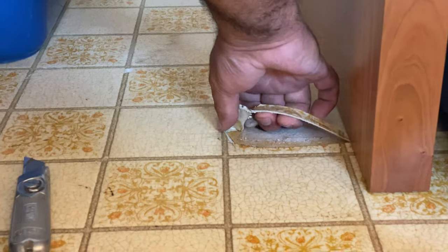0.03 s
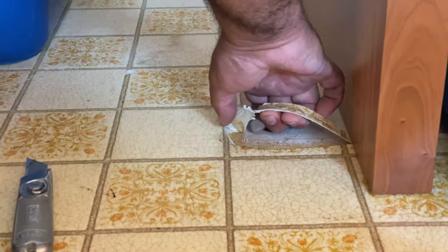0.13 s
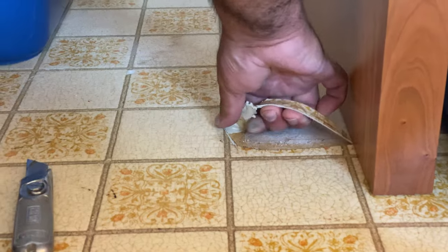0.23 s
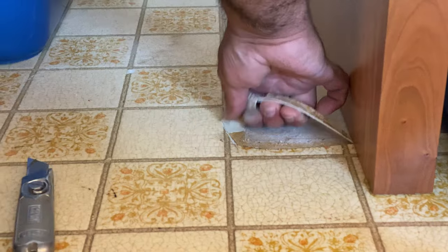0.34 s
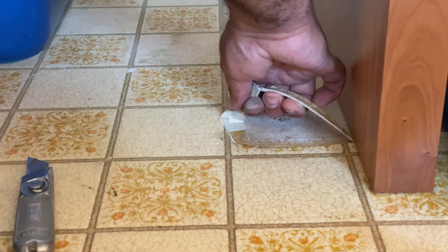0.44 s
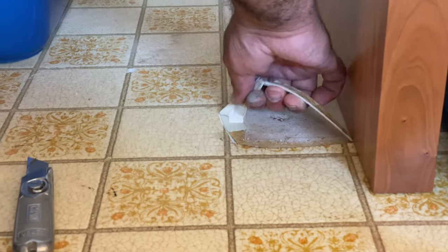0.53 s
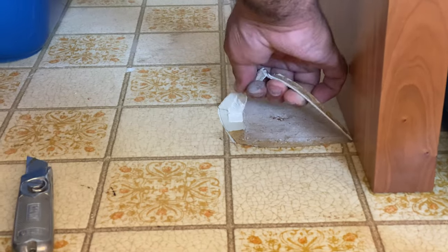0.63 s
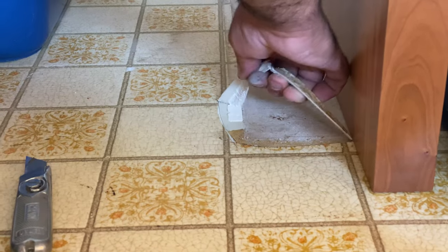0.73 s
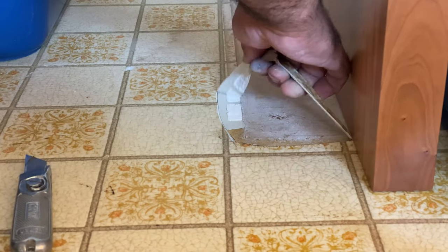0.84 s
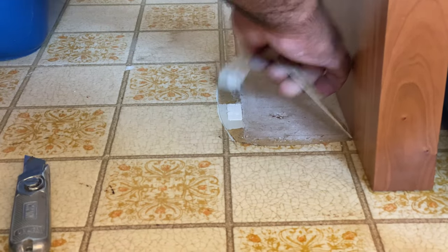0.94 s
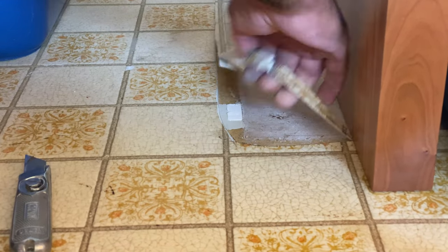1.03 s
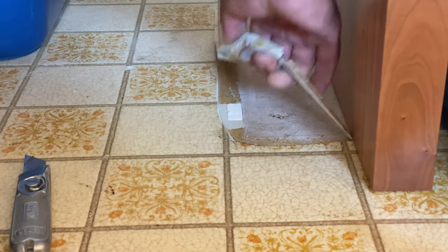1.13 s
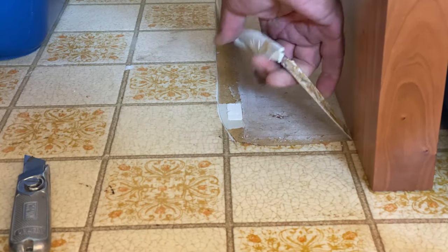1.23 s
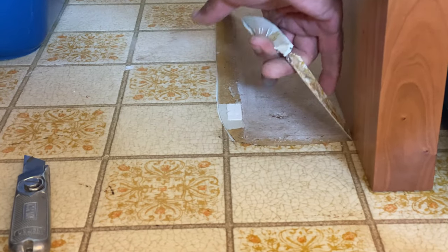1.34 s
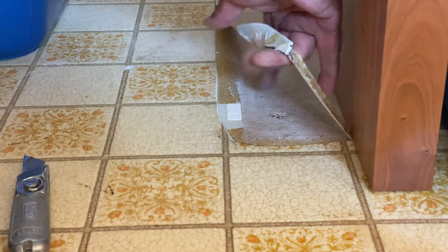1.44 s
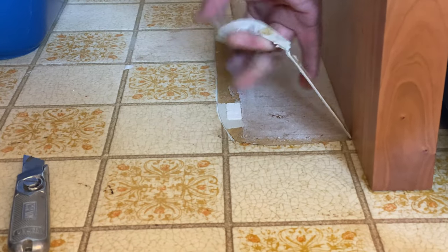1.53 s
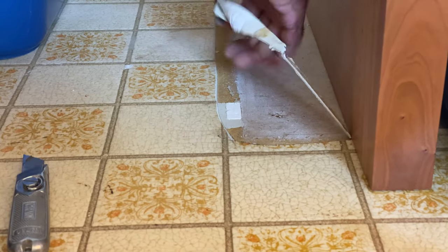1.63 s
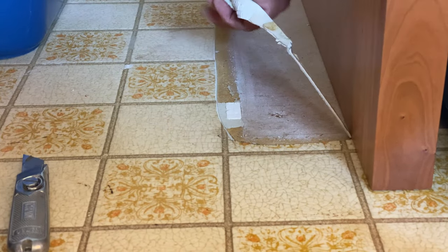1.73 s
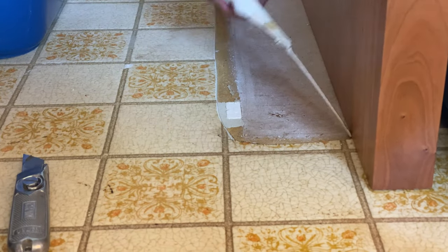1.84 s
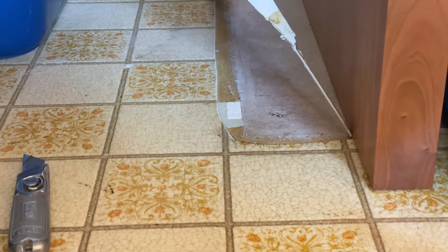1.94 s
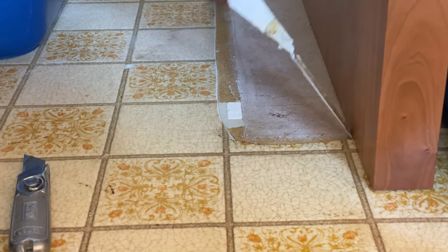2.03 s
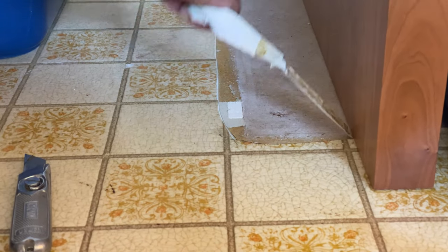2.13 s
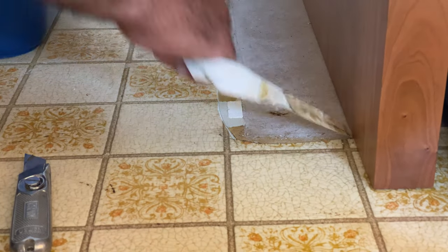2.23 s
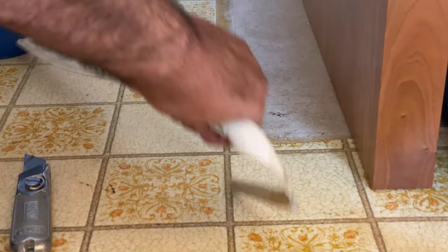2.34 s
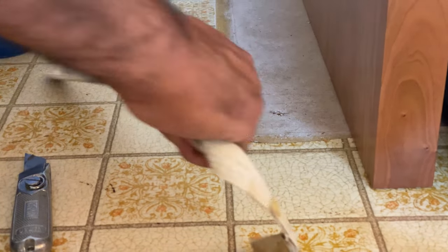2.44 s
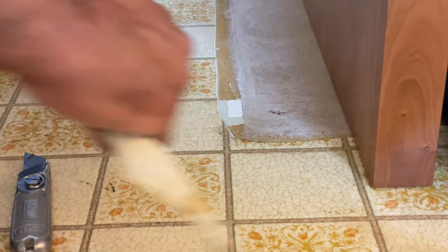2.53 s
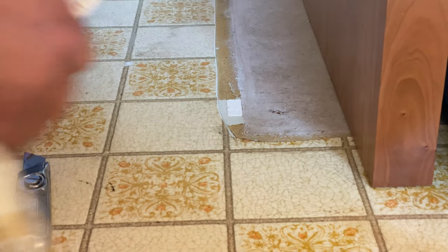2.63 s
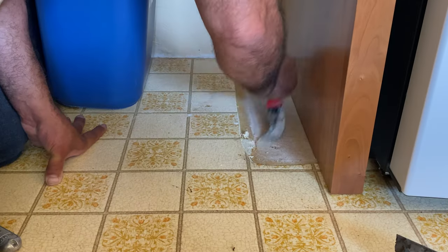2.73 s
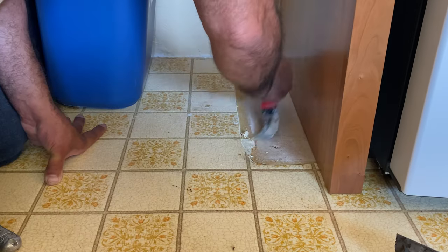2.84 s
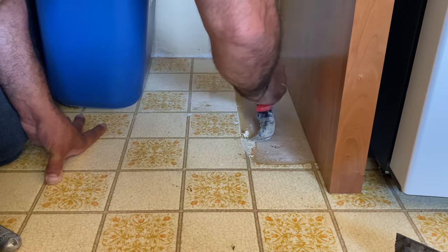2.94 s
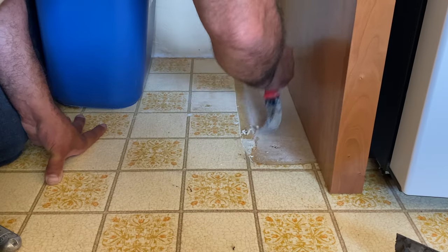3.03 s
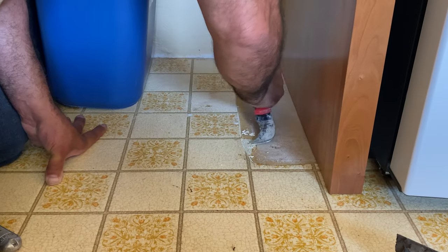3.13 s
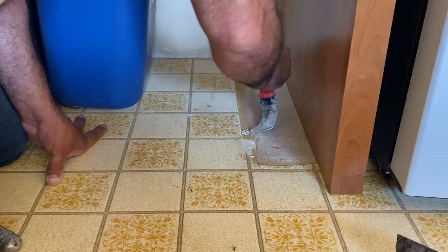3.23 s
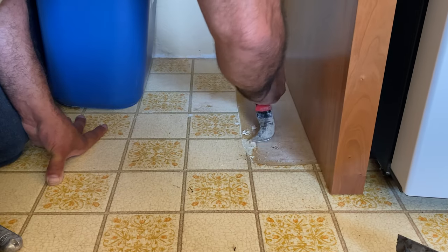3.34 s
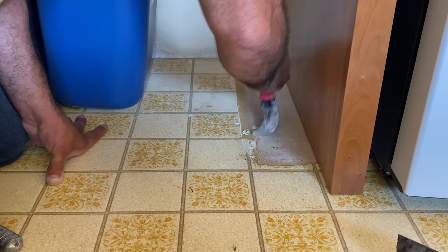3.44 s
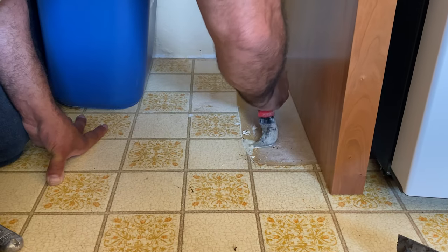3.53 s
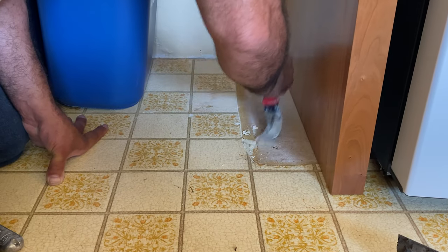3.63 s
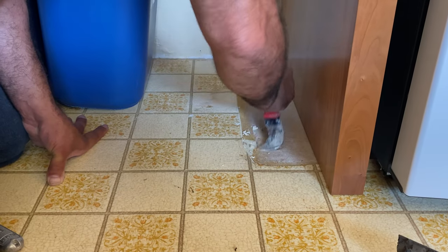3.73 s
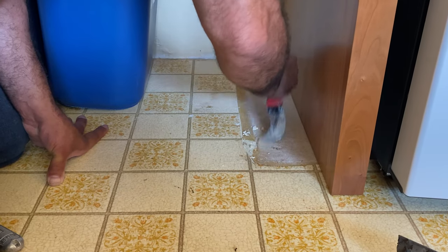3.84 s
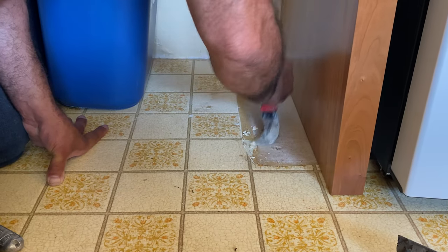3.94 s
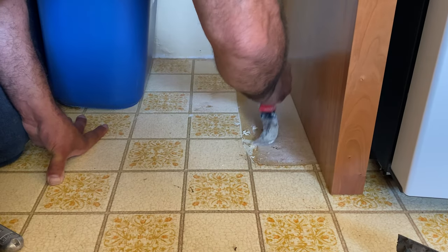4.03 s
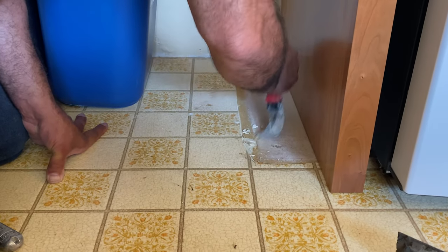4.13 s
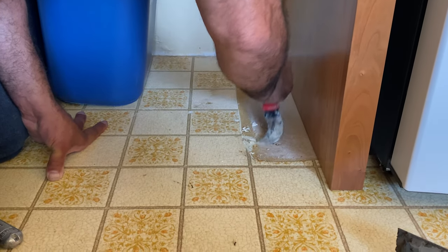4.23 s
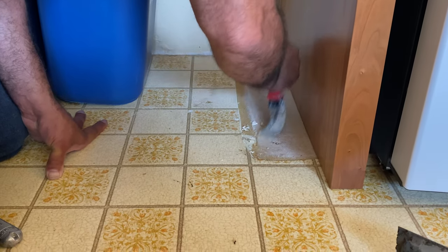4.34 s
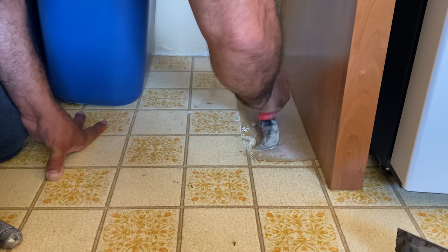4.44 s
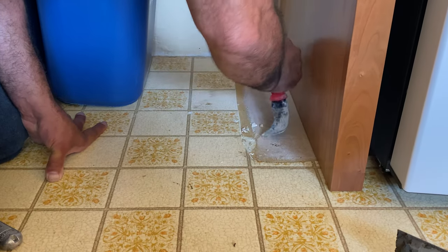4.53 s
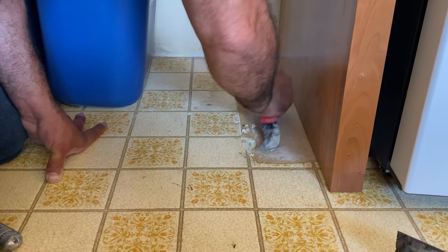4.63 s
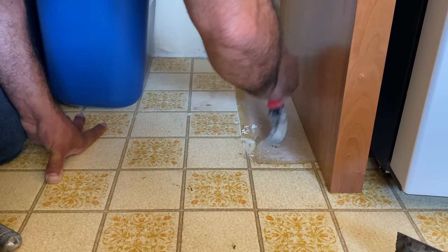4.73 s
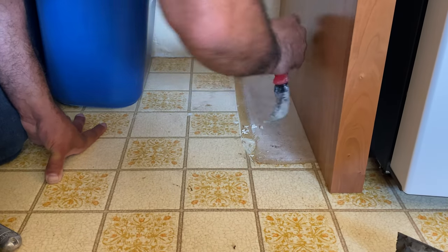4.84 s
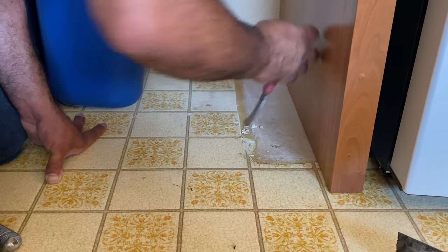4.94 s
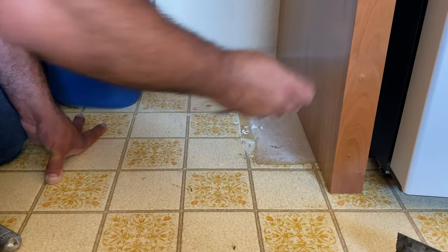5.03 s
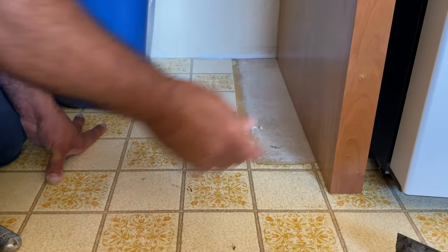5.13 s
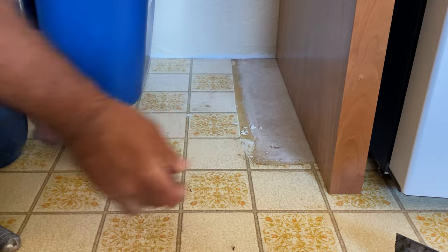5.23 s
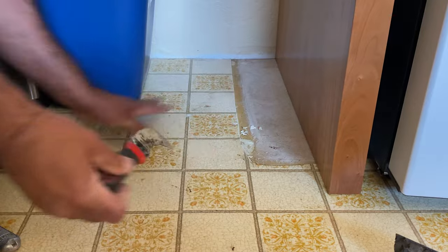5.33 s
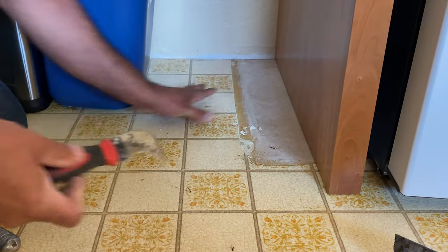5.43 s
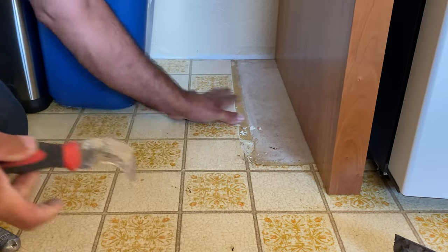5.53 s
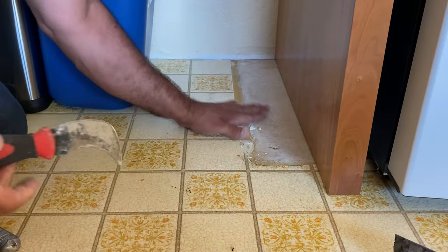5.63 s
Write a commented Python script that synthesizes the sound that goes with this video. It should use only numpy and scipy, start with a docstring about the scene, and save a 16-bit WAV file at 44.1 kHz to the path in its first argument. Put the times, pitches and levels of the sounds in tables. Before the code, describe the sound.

Indoors, close to the floor, with short room reflections and a faint low room tone. From 0 to 0.5 s a few dry ticks and one sharp snap sound as glued vinyl starts lifting. Cracks thicken from 0.55 s into a loud, brittle, tearing crackle, strongest at about 0.92-0.98 s, with soft board thumps beneath. From 1.05 to 2.1 s there is only airy rustling, small creaks and sparse ticks. At 2.18 s the strip slaps down with a dull thud and brief rustle, then a short lull. From 2.74 s a steel scraper jabs: two strokes close together, then one roughly every 0.2 s until about 4.7 s, ten in all. Each has a clattery mid-pitched blade contact, a quickly fading gritty scrape and a low wooden thump; softer drag-back ticks fall between. After 4.8 s it is quiet, with faint handling clicks near 5.2 s and soft bumps and a breathy skin rub from 5.5 s.

```python
"""Glue cracks as a hand peels a strip of old vinyl off a wooden floor; the strip rustles and slaps down.
Then a steel putty knife jabs quickly under the next tile, and pushes thump the boards in a small room.
Cracks are shaped noise bursts; the rustle and sliding blade are coloured noise with chance catches.
Jabs drive ringing blade and tile modes with random slips; thumps are decaying sines of the boards.
Room tone lies underneath, and sparse random reflections make the reverberation."""
import sys
import numpy as np
from scipy import signal
from scipy.fft import rfft, irfft, next_fast_len
from scipy.io import wavfile
from scipy.ndimage import uniform_filter1d

SR = 44100
rng = np.random.default_rng(int(sys.argv[2]) if len(sys.argv) > 2 else 0)


def unload_audio(sound):
    """Save the sound as a 16-bit wav file, at the path given as the first command line argument."""
    columns = np.transpose(np.atleast_2d(sound))
    # keep every value between -1 and 1, then stretch to whole-number steps
    steps = np.round(np.clip(columns, -1, 1) * 32767)
    wavfile.write(sys.argv[1], SR, steps.astype(np.int16))


N = 250355

# Glue and vinyl cracking, the strip slapping. Each row: start in seconds, level of the bright part in dB,
# centre in Hz, length in ms, low body relative to the bright part in dB.
CRACK_EVENTS = [(.0813, -47, 4640, 3.5, -26), (0.1519, -23.5, 3640, 2.4, -11.5),
                (.2343, -39, 2530, 6.7, -22), (.2765, -33.5, 5440, 4.2, -37), (0.3047, -43, 5520, 2.8, -22),
                (0.3368, -12.5, 5400, 1.9, -15.5), (0.3506, -21, 4860, 5.6, -27),
                (0.5653, -14.5, 4630, 4.4, -11.5), (.658, -20.5, 7150, 4.2, -33),
                (0.671, -25, 2760, 3.6, -27), (0.6981, -11.5, 7140, 0.28, -23), (.716, -29, 5240, 2.5, -34),
                (.789, -16.5, 5160, 7.4, -16), (.8182, -11, 5100, 2.8, -14), (.839, -8.5, 5830, 3.2, -21.5),
                (0.9172, -12.5, 6800, 10, -9.5), (0.9268, -1.5, 3880, 2.8, -15),
                (.9324, -21, 3760, 3.5, -27), (0.9402, -7.5, 6270, 2.8, -39),
                (0.947, -7.5, 7310, 2.7, -36.5), (.9701, -4, 6600, 2.3, -30), (.9725, -7, 6900, 1.1, -16.5),
                (0.9807, -8.5, 7190, 2.4, -33), (0.9839, -18, 2420, 1.4, -20),
                (1.2066, -40.5, 3330, 4.4, -3), (1.267, -42.5, 4300, 2.6, -9), (1.313, -40, 2810, 3.8, -12),
                (1.552, -28.5, 3240, 8.8, -32), (1.5606, -34.5, 2850, 8, -10), (1.676, -34, 2680, 3.6, -21),
                (1.722, -36.5, 2900, 6.4, -12), (1.8396, -26, 4900, 1.6, -8.5),
                (1.8904, -28, 2070, 3.5, -14), (1.9164, -32.5, 3960, 2.1, -14),
                (2.07, -37, 5400, 3.2, -28.5), (2.093, -30, 2740, 5.1, -26), (2.1784, -29, 2080, 5.7, 16.5),
                (2.222, -27.5, 2470, 8.2, 3), (2.2408, -25.5, 2080, 3.5, -13),
                (2.2557, -16.5, 3260, 5, -14), (2.2955, -28.5, 2040, 2.9, -0.5),
                (2.3812, -39.5, 2050, 5.2, 3), (2.7073, -44, 4650, 5.5, -3), (4.6189, -26.5, 3900, 6, -3),
                (4.7381, -39.5, 2440, 5.5, 3), (4.8358, -44.5, 2340, 1.2, 0),
                (5.2006, -31.5, 4500, 3.7, -10), (5.231, -48, 2830, 2.8, 7),
                (5.3075, -39.5, 2850, 2.7, -2.5)]
# Colour shared by the cracks. Each row: frequency in Hz, gain in dB.
CRACK_COLOUR = [(300, 7.5), (1000, -3.5), (2500, -4), (6000, 0), (9000, -1), (13000, -4.5), (15500, 7.5),
                (16500, 5)]
CRACK_FIZZ_DB = -2.2  # trim of every crack over 11 kHz
STRIP_HZ, STRIP_DB = 440, 6  # the bent strip's hollow under each crack's body


def cracks():
    """Each crack is a sharp front and a few milliseconds of splintering; its low body dies more slowly."""
    out, t = np.zeros(N), np.arange(2500) / SR
    noises = rng.standard_normal((len(CRACK_EVENTS), 2500))

    def body_gain_db(f):
        broad = -6.0 * np.log2((f + 1) / 900) ** 2
        hollow = STRIP_DB - 60 * np.log2((f + 1) / STRIP_HZ) ** 2
        return np.maximum(broad, hollow)

    for (s, db, centre_hz, ms, body_db), noise in zip(CRACK_EVENTS, noises):
        ms = max(ms, .3)

        def bright_gain_db(f):
            off_centre = np.minimum(np.log2((f + 1) / centre_hz) ** 2, 2.5)
            return read(CRACK_COLOUR, f) - 4.35 * off_centre + CRACK_FIZZ_DB * shelf(f, 11000, order=8)

        splintering = (1 - np.exp(-4000 * t / ms)) * np.exp(-(1000 * t / ms) ** 2)
        front = .5 * np.exp(-t / 0.000068)
        bright = colour(noise, bright_gain_db) * (splintering + front)
        body = colour(noise, body_gain_db) * np.minimum(t / 0.0008, 1) * np.exp(-400 * t / ms)
        add(out, s - .0004, amp(db) * (peaked(bright) + amp(body_db) * peaked(body)))
    return out


# Skin and vinyl rubbing, gliding from row to row. Each row: time in seconds, level in dB,
# lift of the low body in dB, lift of the fizz in dB.
RUSTLE_COURSE = [(0.0, -100, -21, -16), (.1, -59, 3.5, 8), (.45, -73.5, 14.5, 8), (.55, -56, 8.5, 15),
                 (.9, -75, -3, 2.5), (1.05, -48, 3, 11), (1.3, -67.5, 12, 4), (1.5, -60, 6.5, 9),
                 (1.8, -66.5, -1.5, 8), (1.9, -60.5, 14.5, 13.5), (2.02, -56, -0.5, 7),
                 (2.16, -61, 1.5, -18.5), (2.2, -41, 7, -13.5), (2.4, -56.5, 9, -12),
                 (2.52, -71.5, 9.5, -13), (2.66, -72.5, 1.5, -6.5), (2.71, -53, 9, -10),
                 (4.8, -68.5, 4.5, 8), (5.06, -73, 13, 5.5), (5.19, -60, 7.5, 11), (5.31, -64.5, 3.5, 9),
                 (5.37, -68.5, 5, 7), (5.49, -70.5, 7, 8), (5.58, -51, -4, 17), (5.67, -46, 6, 8)]
# Colour of the rubbing. Each row: frequency in Hz, gain in dB.
RUB_COLOUR = [(40, -33.5), (110, -4), (250, -8.5), (700, -20.5), (1700, -13.5), (3000, -17), (6000, -20.5),
              (9000, -31.5), (14000, -38.5), (16500, -33.5)]
# Spells when the rubbing takes on one colour. Each row: middle in seconds, half length in seconds,
# centre in Hz, width in octaves, boost in dB.
CREAK_SPELLS = [(1.435, 0.068, 1620, 0.26, 11.5), (1.48, 0.037, 626, 0.54, 14.5),
                (1.641, 0.046, 990, 0.12, 22), (1.67, .08, 2850, 0.1, 13), (5.23, 0.098, 5040, 0.41, 8.5),
                (5.63, 0.051, 1440, 0.25, 6)]
# The freed vinyl rustles on after each crack: level dB = TRAIL_DB + TRAIL_SHARE x crack dB, then it falls.
TRAIL_DB, TRAIL_SHARE, TRAIL_FALL_DB_PER_S = -35.5, 0.72, 218.5


def rustle():
    """Dense uneven ticks blur into a hiss; patches of colour drift by chance; listed spells add the creaks."""
    course_s, course_db, course_body_db, course_fizz_db = np.transpose(RUSTLE_COURSE)
    flutter = amp(0.92 * evened(uniform_filter1d(rng.standard_normal(N), 150)))
    ticks = evened(snags()) * rng.standard_normal(N) * flutter
    hz, t, spectrum = signal.stft(ticks, SR, nperseg=512)

    now = np.arange(N) / SR
    crack_s, crack_db = np.transpose(CRACK_EVENTS)[:2]
    trails = dying(now, crack_s, TRAIL_DB + TRAIL_SHARE * crack_db, TRAIL_FALL_DB_PER_S)
    level = np.sqrt(amp(np.interp(now, course_s, course_db)) ** 2 + trails)

    body_db, fizz_db = np.interp(t, course_s, course_body_db), np.interp(t, course_s, course_fizz_db)
    colour_db = read(RUB_COLOUR, hz)[:, None]
    colour_db = colour_db + np.outer(1 - shelf(hz, 1320, order=6), body_db)
    colour_db += np.outer(shelf(hz, 7400, order=6), fizz_db)
    for mid_s, half_s, centre_hz, octaves, db in CREAK_SPELLS:
        band = np.exp(-(np.log2((hz + 1) / centre_hz) / octaves) ** 2)
        colour_db += db * np.outer(band, np.exp(-((t - mid_s) / half_s) ** 4))
    patches = rng.standard_normal(spectrum.shape)
    patches = evened(uniform_filter1d(uniform_filter1d(patches, 5, 0), 12, 1))

    # the base colour's power from 2 to 9 kHz sets the reference level
    middle = amp(read(RUB_COLOUR, hz))[(hz > 2000) & (hz < 9000)]
    scale = np.sqrt(np.mean(middle ** 2) * 7000 / (SR / 2))
    return level * signal.istft(spectrum * amp(colour_db + 1.3 * patches) / scale, SR, nperseg=512)[1][:N]


# One push of the knife. Each row: start in seconds, slide level in dB, slide fall in dB per second,
# low ring left free in Hz, high ring left free in Hz, knock of the tile in Hz, ring of the sliding edge in Hz.
KNIFE_STROKES = [(2.738, -36.5, 90, 1410, 2870, 420, 2670), (2.842, -35.5, 103, 1290, 4140, 516, 2460),
                 (3.072, -32.5, 163, 1240, 1920, 374, 2000), (3.286, -30, 127, 1260, 3860, 446, 2520),
                 (3.516, -35.5, 120, 1400, 1934, 417, 2200), (3.716, -32, 111, 1225, 2130, 440, 2290),
                 (3.947, -34.5, 91, 1330, 2370, 410, 2380), (4.169, -33.5, 160, 1280, 3330, 467, 2420),
                 (4.37, -36, 113, 1165, 1930, 430, 2330), (4.583, -37, 122.5, 1120, 3380, 483, 2250)]


def grip(t):
    """Low ring, high ring, knock pitch and edge ring in Hz; the hand's grip holds until the next stroke."""
    strokes = np.array(KNIFE_STROKES)
    under_way = np.maximum(np.searchsorted(strokes[:, 0], t + .004) - 1, 0)
    return strokes[under_way, 3:].T


# The blade touches, stops against the glue or is dragged back. Each row: start in seconds,
# level of the low ring in dB, chatter decay in ms, then tile knock and hardness relative to that ring in dB.
JAB_EVENTS = [(2.7396, -15, 6.3, -4.5, -2.5), (2.8419, -17.5, 12, -1, -13), (2.859, -13, 5.7, -1, -1.2),
              (3.004, -28.5, 4.2, -1.5, -0.5), (3.0097, -29, 3.3, -27, -4), (3.073, -16.5, 15, 2.5, -5.5),
              (3.0892, -13, 3.4, -8.5, 2.4), (3.225, -26.5, 22, -7, -3.5), (3.2866, -17.5, 7.7, 2.5, -1.5),
              (3.3007, -18.5, 12, 2.5, 0), (3.3068, -15, 7, -24, 1), (3.4409, -32.5, 4.5, 2.5, -5.5),
              (3.521, -16, 4.8, 4, -6), (3.5253, -17, 4.3, 0.5, 7.5), (3.6583, -46, 3.6, 10, 4.5),
              (3.7199, -16, 5.6, 4.5, -0.2), (3.7277, -13.5, 9.8, -6, -2.5), (3.8595, -36, 5.2, 3.5, -22),
              (3.9507, -15, 6.3, -3, 2.5), (3.9545, -17, 3.1, -3, 1), (4.091, -49, 7.8, -11, -7),
              (4.1699, -13.5, 2.2, -7.5, -10), (4.1802, -16.5, 6, -5, -5.5), (4.1985, -25.5, 2.6, 6, -7),
              (4.284, -38.5, 9, 1, -3.5), (4.372, -22, 14, 9.5, -5), (4.3801, -12, 6.9, -8.5, -11),
              (4.4093, -26, 6.8, 0, -8.5), (4.4898, -48, 9.1, 14, 10), (4.5128, -38.5, 3.9, 2, 1.2),
              (4.5854, -22.5, 33, 0.5, -11), (4.5976, -21, 14, 4.5, -23), (4.6189, -29, 9.4, 8.5, 7),
              (4.6479, -23, 7.6, -6, -30), (4.6794, -44, 15, 8, -13)]
# Modes of blade and handle. Each row: frequency in Hz, width in Hz, level in dB.
BLADE_MODES = [(610, 42, 4), (759, 130, 5.5), (1030, 78, -2.5), (1130, 45, 3), (1292.4, 43, 4),
               (1496, 38.6, 4), (1936, 28, -7.5), (2096, 29, -12.5), (2610, 125, -13), (3050, 97, -8.5),
               (3252, 120, -8), (3470, 150, -12.5), (4003, 280, -8.5), (5150, 300, -18)]
# The stiff tile knocks. Each row: frequency in Hz, width in Hz, level in dB.
TILE_MODES = [(351, 85, -6), (382.6, 59, -3.5), (447, 61, -4.5), (526.4, 72, -1), (542, 73, -2)]
# Crushed glue under the blade. Each row: frequency in Hz, gain in dB.
GRIT_COLOUR = [(1500, -19), (3000, -4), (5500, 1), (8000, -2.5), (11000, -6.5), (14500, -4), (16500, -11)]


def jabs():
    """A firm first slip, then a dying chatter; slips ring the blade, knock the tile and crush grit."""
    out, t = np.zeros(N), np.arange(5000) / SR
    blade_hz, tile_hz = np.transpose(BLADE_MODES)[0], np.transpose(TILE_MODES)[0]
    blade = rings(BLADE_MODES, t)
    tile = rings(TILE_MODES, t) * (1 - np.exp(-t / 0.0017))
    smear = np.exp(-np.arange(60) / 27.0)  # grit lingers briefly after each slip
    chances = rng.random((len(JAB_EVENTS), 3, 5000))

    for (s, db, ms, knock_db, hard_db), (a, b, c) in zip(JAB_EVENTS, chances):
        low_hz, high_hz, knock_hz = grip(s)[:3]
        force = np.exp(-1000 * t / max(ms, .5))
        slips = force * (a < 1500 / SR) * (.5 + b) * np.sign(c - .35)  # about 1500 slips a second
        slips[0] = 1.46
        mode_chance = amp(3.0 * (c[:len(BLADE_MODES)] - .5))  # each mode's strength varies from jab to jab
        low_ring = mode_chance * freed(blade_hz, low_hz, 31.0, -63.0) @ blade
        high_ring = mode_chance * freed(blade_hz, high_hz, 38.0, -5.5) * (blade_hz > 1700) @ blade
        knock_ring = freed(tile_hz, knock_hz, 36.0, -10.0) @ tile
        low, high, knock = (peaked(signal.fftconvolve(slips, ring)[:len(t)])
                            for ring in (low_ring, high_ring, knock_ring))
        crushing = 1.6 * force + np.convolve(abs(slips), smear)[:len(t)]
        grit = colour((a - .5) * crushing, lambda f: read(GRIT_COLOUR, f))
        hard = amp(hard_db) * (high + 0.49 * peaked(grit))  # hard contact wakes high modes and grit together
        add(out, s - .0005, amp(db) * (low + amp(knock_db) * knock + hard))
    return out


# Every touch is followed by a short scuff: level dB = SCUFF_DB + SCUFF_SHARE x jab dB, then it falls.
SCUFF_DB, SCUFF_SHARE, SCUFF_FALL_DB_PER_S = -36.5, 0.36, 400
SLIDE_RING_WIDTH_HZ, SLIDE_RING_DB, SLIDE_GRIT_DB = 340, -5, -16


def drag():
    """Fine slips of the sliding edge keep the blade ringing and grind grit."""
    flutter = amp(1.1 * evened(uniform_filter1d(rng.standard_normal(N), 60)))
    slips = snags() * rng.standard_normal(N) * flutter
    hz, t, spectrum = signal.stft(evened(slips), SR, nperseg=512)

    now = np.arange(N) / SR
    push_s, slide_db, fall = np.transpose(KNIFE_STROKES)[:3]
    jab_s, jab_db = np.transpose(JAB_EVENTS)[:2]
    power = dying(now, push_s, slide_db, fall)
    power += dying(now, jab_s, SCUFF_DB + SCUFF_SHARE * jab_db, SCUFF_FALL_DB_PER_S)

    low_hz, _, _, edge_hz = grip(t)
    column_hz = hz[:, None]
    modes = np.sqrt(sum(amp(db) ** 2 / (1 + ((column_hz - f) / w) ** 2)
                        for f, w, db in TILE_MODES + BLADE_MODES))
    low = modes * freed(column_hz, low_hz, 23.0, -12.0)
    high = modes / (1 + ((column_hz - edge_hz) / SLIDE_RING_WIDTH_HZ) ** 2)
    low_part = low / np.sqrt(np.mean(low ** 2, 0))
    high_part = amp(SLIDE_RING_DB) * high / np.sqrt(np.mean(high ** 2, 0))
    grit = amp(SLIDE_GRIT_DB) * evened(amp(read(GRIT_COLOUR, hz)))[:, None]
    return np.sqrt(power) * signal.istft(spectrum * (low_part + high_part + grit), SR, nperseg=512)[1][:N]


# Pushes on the boards. Each row: start in seconds, peak in dB, pitch that this spot favours in Hz,
# ring time as a factor.
THUMP_EVENTS = [(0.046, -41, 124, 1), (0.091, -40, 128, 0.95), (0.159, -29, 137, 1), (0.338, -35, 142, 1),
                (0.354, -20, 138, 0.27), (0.524, -32, 130, 0.59), (0.543, -26, 160, 0.55),
                (0.569, -23, 153, 0.63), (0.675, -16, 125, 1), (0.701, -22, 132, 0.3),
                (0.724, -27.5, 77, 0.46), (0.793, -24.5, 87, 1), (0.82, -17, 134, 1),
                (0.842, -31, 100, 0.45), (0.92, -24, 230, 0.43), (0.933, -8, 127, 0.55),
                (0.974, -24, 169.3, 0.64), (1.116, -33.5, 93, 1), (1.552, -39, 91.5, 1),
                (1.695, -31.5, 111, 1), (1.844, -28.5, 175, 0.47), (1.888, -33, 156, 1),
                (1.912, -36, 152, 0.83), (2.184, -10.5, 229, 0.37), (2.226, -19.5, 100, 0.73),
                (2.26, -35, 83.4, 1), (2.74, -21.5, 146, 1), (2.854, -10, 129, 0.94),
                (2.869, -21.5, 113, 0.52), (3.009, -30, 111, 0.75), (3.085, -16.5, 150, 0.38),
                (3.098, -8, 114, 0.74), (3.239, -23, 149, 0.53), (3.296, -11.5, 151, 0.39),
                (3.316, -6, 138, 0.43), (3.45, -31, 125, 0.78), (3.526, -11, 146, 0.85),
                (3.728, -10, 125, 1), (3.748, -15, 254, 0.47), (3.954, -10, 140, 0.96),
                (4.091, -32, 118, 0.38), (4.177, -15.5, 111, 0.74), (4.196, -16.5, 167, 0.5),
                (4.226, -25.5, 76.6, 0.46), (4.382, -10.5, 126, 0.86), (4.519, -24.5, 133.7, 0.9),
                (4.595, -17.5, 159, 1), (4.625, -22.5, 153, 0.64), (4.659, -19.5, 147, 1),
                (5.196, -44, 148, 0.67), (5.524, -34, 119, 1), (5.549, -32.5, 102, 0.97),
                (5.6, -42, 162, 0.87)]
# Modes of the floor boards. Each row: frequency in Hz, level in dB, time to fall 60 dB in seconds.
BOARD_MODES = [(71.7, -2, 0.43), (111.3, -1.5, 0.12), (128, 5.5, 0.095), (155.4, 1.5, 0.14),
               (208.2, 3.5, 0.14), (260.8, 7.5, 0.17), (312, -9.5, 0.14), (422, -5, 0.058),
               (422, -18.5, 0.056)]


def thumps():
    """A soft push rings the floor boards, most the modes near the pitch of the spot."""
    out, t = np.zeros(N), np.arange(12000) / SR
    soft_onset = (1 - np.exp(-t / 0.0031)) ** 2
    for s, db, spot_hz, lasting in THUMP_EVENTS:
        ring = np.zeros(len(t))
        for hz, mode_db, t60 in BOARD_MODES:
            off_spot_db = 29.5 * min(np.log2(hz / spot_hz) ** 2, .75)
            fall_db = 60 * t / (t60 * max(lasting, .15))
            ring += amp(mode_db - off_spot_db - fall_db) * np.sin(2 * np.pi * hz * t)
        add(out, s - .002, amp(db) * peaked(ring * soft_onset))
    return out


SNAGS_PER_S, SNAG_S, SNAG_DB = 60, .003, -1  # chance catches in any rubbing: rate, decay, mean added gain


def snags():
    """Gain of a rubbing contact that now and then catches and lets go."""
    catches = rng.exponential(1, N) * (rng.random(N) < SNAGS_PER_S / SR)
    return 1 + amp(SNAG_DB) * signal.lfilter([1], [1, -np.exp(-1 / (SNAG_S * SR))], catches)


# Decay of the room. Each row: frequency in Hz, time to fall 60 dB in seconds.
ROOM_DECAY = [(80, 0.46), (250, 0.26), (700, 0.36), (1500, 0.41), (4000, 0.25), (10000, 0.23)]


def room(x):
    """Sparse reflections of random sign swell in within milliseconds, each band dying at its own speed."""
    taps = np.zeros((2, 30000))
    at = np.arange(120, 29980, 20) + rng.integers(0, 20, (2, 1493))  # one in every 20 samples
    np.put_along_axis(taps, at, rng.choice([-1., 1.], at.shape), 1)
    hz, t, spectrum = signal.stft(pair(*taps), SR, nperseg=512)
    swell = 1.1 - np.exp(-t / 0.0017)
    decay = amp(-60 * t / read(ROOM_DECAY, hz)[:, None])
    tail = signal.istft(spectrum * swell * decay, SR, nperseg=512)[1]
    tail[:, :120] = 0  # nothing returns before the first reflection
    return signal.fftconvolve(x[None], tail / np.linalg.norm(tail[0]), axes=1)[:, :N]


# Colour of the room tone. Each row: frequency in Hz, gain in dB.
HUSH_COLOUR = [(15, -24.5), (25, -1.5), (101, -3), (237, -7.5), (665, -16.5), (817, -12), (1870, -20),
               (2300, -42), (4990, -44.5), (10500, -64), (12000, -61.5), (15600, -101), (22000, -120)]
HUSH_DB = -53.5


def hush():
    """Steady room tone, slightly swelling."""
    left, other, drift = rng.standard_normal((3, N))
    swell = amp(1.0 * evened(uniform_filter1d(uniform_filter1d(drift, 5000), 5000)))
    tone = evened(colour(pair(left, other), lambda f: read(HUSH_COLOUR, f)))
    return amp(HUSH_DB) * swell * tone


# Left-right likeness of reverberation and room tone. Each row: frequency in Hz, likeness from -1 to 1.
LIKENESS = [(60, 1), (250, 0.78), (600, 0.22), (1600, -0.4), (3000, -0.19), (7000, 0.33), (10000, .8),
            (16000, .85)]


def pair(left, other):
    """A second channel that shares the bass and follows the likeness curve above it."""
    size = next_fast_len(len(left))
    same = np.clip(read(LIKENESS, np.fft.rfftfreq(size, 1 / SR)), -.99, .99)
    right = same * rfft(left, size) + np.sqrt(1 - same ** 2) * rfft(other, size)
    return np.array([left, irfft(right, size)[:len(left)]])


def rings(modes, t):
    """One decaying sine a mode; a wider mode dies faster."""
    return np.array([(-1) ** k * amp(db) * w * np.exp(-np.pi * w * t) * np.sin(2 * np.pi * hz * t)
                     for k, (hz, w, db) in enumerate(modes)])


def freed(hz, free_hz, db_per_octave2, floor_db):
    """Gain of modes that fall away on both sides of a favoured pitch."""
    return amp(np.maximum(-db_per_octave2 * np.log2((hz + 1) / free_hz) ** 2, floor_db))


def dying(t, starts, levels_db, falls_db_per_s):
    """Summed power of sounds that start at once and then fall steadily in dB."""
    levels_db, falls = np.reshape(levels_db, (-1, 1)), np.reshape(np.abs(falls_db_per_s), (-1, 1))
    since = t - np.reshape(starts, (-1, 1))
    level_db = levels_db - falls * np.maximum(since, 0)
    return (amp(level_db) ** 2 * (since >= 0)).sum(0)


def amp(db):
    """Decibels to amplitude."""
    return 10 ** (np.asarray(db) / 20)


def evened(x):
    """Scales to an RMS of 1."""
    return x / np.sqrt(np.mean(x ** 2) + 1e-20)


def peaked(x):
    """Scales to a peak of 1."""
    return x / (abs(x).max() + 1e-12)


def read(points, hz):
    """Reads a curve of (Hz, value) points along log frequency."""
    f, value = np.transpose(points)
    return np.interp(np.log(hz + 1), np.log(f + 1), value)


def shelf(hz, corner_hz, order):
    """Rises from 0 to 1 about the corner."""
    return 1 / (1 + (corner_hz / (hz + 1)) ** order)


def colour(x, gain_db):
    """Multiplies the spectrum by a gain in dB given as a function of Hz."""
    size = next_fast_len(x.shape[-1] + 2048)
    gain = amp(gain_db(np.fft.rfftfreq(size, 1 / SR)))
    return irfft(rfft(x, size) * gain, size)[..., :x.shape[-1]]


def add(mix, s, sound):
    """Lays a sound into the mix from s seconds on."""
    part = mix[max(round(s * SR), 0):][:len(sound)]
    part += sound[:len(part)]


def scene():
    """Direct sound a little to the right, each source's share of the room, and the room tone."""
    snap, jab, thump, rub = cracks(), jabs() + drag(), thumps(), rustle()
    direct = (snap + jab + thump + rub) * amp([[-.4], [.4]])
    wet = amp(-7.5) * snap + amp(-5.0) * jab + amp(-8.5) * thump + amp(-7.5) * rub
    return direct + room(wet) + hush()


# The two microphone ports part in the treble, opposed near 8.5, 12 and 16 kHz.
# Each row: frequency in Hz, phase by which left leads in radians.
PORT_PHASE = [(0, 0), (1800, .1), (3200, .55), (6800, 0), (8000, -1.9), (8450, -3.14), (9000, -4.6),
              (10200, -6.3), (11000, -7.5), (12000, -9.42), (14000, -12.6), (15800, -15.6)]
EDGE_HZ = 16700  # upper band limit


def record(dry):
    """Phase between the ports in the treble, a bass roll-off, then the band limit."""
    size = next_fast_len(N + 2048)
    hz = np.fft.rfftfreq(size, 1 / SR)
    phase = np.interp(hz, *np.transpose(PORT_PHASE))
    lead = np.exp(.5j * np.outer([1, -1], phase))  # half to each side
    bass_cut = np.sqrt(shelf(hz, 50, order=6))
    miked = irfft(rfft(dry, size) * lead * bass_cut, size)[:, :N]
    edge = signal.firwin(511, EDGE_HZ, window=("kaiser", 9), fs=SR)
    return signal.oaconvolve(miked, edge[None], "same")


dry = scene()
out = record(dry)
unload_audio(out)
```